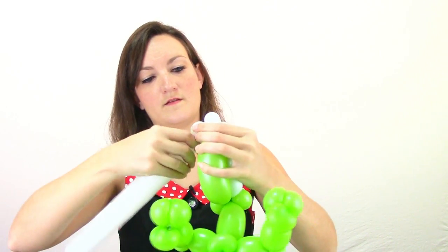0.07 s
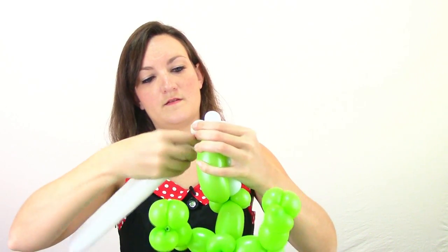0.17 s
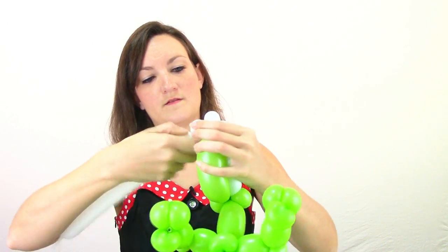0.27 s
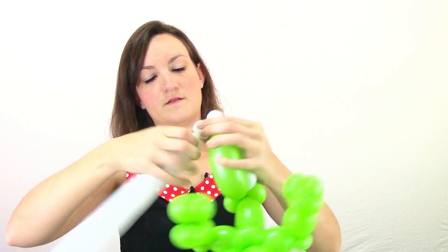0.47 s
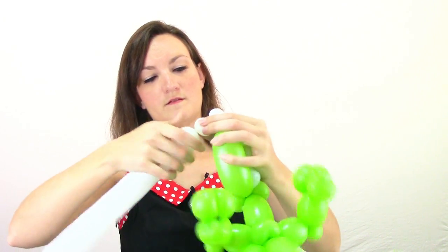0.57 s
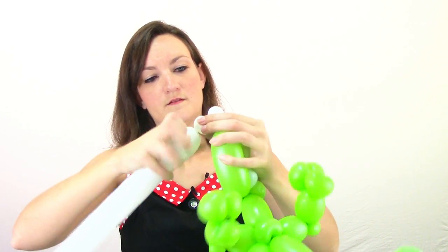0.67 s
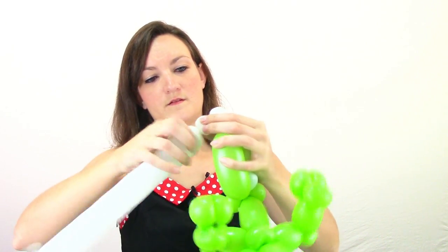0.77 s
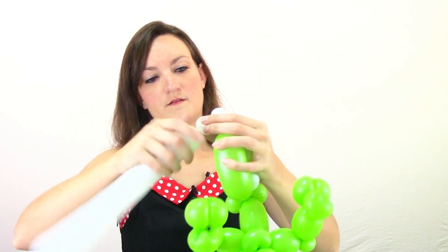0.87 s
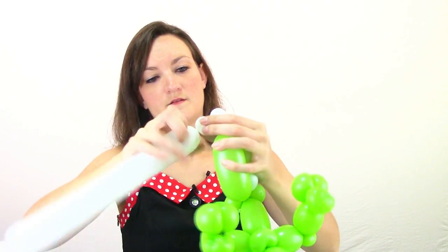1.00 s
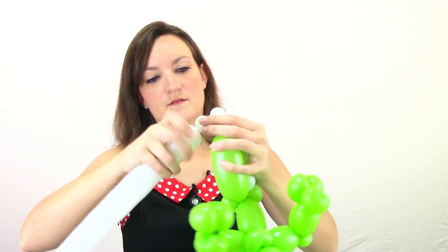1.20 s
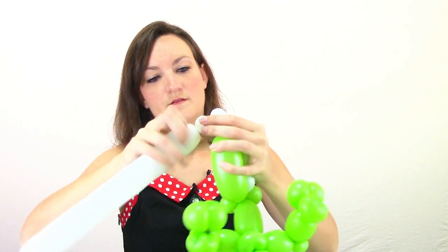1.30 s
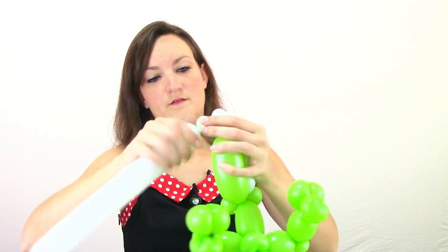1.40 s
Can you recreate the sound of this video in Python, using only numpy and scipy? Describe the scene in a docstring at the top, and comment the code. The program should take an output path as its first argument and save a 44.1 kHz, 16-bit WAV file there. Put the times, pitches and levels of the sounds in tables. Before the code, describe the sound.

Balloons rub and crackle unevenly as hands twist them, close to the microphone in a quiet room. After tiny squeaks, a twist lets go with a quick double snap at about 0.3 seconds. A low thud follows near 0.55 seconds, ringing faintly inside the balloons. The rubbing continues with short squeaks, a softer bump around 0.9 seconds and a cluster of small ticks near 1.2 seconds.

```python
"""In a quiet room, long modelling balloons are twisted by hand, close to the microphone.
Rubber drags over rubber in tiny slips that now and then lock into short squeaks.
A twist lets go with a double snap, then a bubble bumps into place with a low thud.
The air shut in the long balloons rings on, and the room adds a short echo."""
import sys
import numpy as np
from scipy import signal
from scipy.fft import rfft, irfft
from scipy.io import wavfile
from scipy.ndimage import uniform_filter1d

SR = 44100
rng = np.random.default_rng(int(sys.argv[2]) if len(sys.argv) > 2 else 0)


def log_audio(samples):
    """Write samples as a 16-bit WAV file to the path given in sys.argv[1]."""
    # one column per channel
    frames = np.atleast_2d(samples).T
    # limit to full scale, then quantise
    limited = np.clip(frames, -1, 1)
    pcm = np.round(limited * 32767).astype(np.int16)
    wavfile.write(sys.argv[1], SR, pcm)


N = 63945

# tone of the background hiss (frequency [Hz], gain [dB])
HISS_COLOUR = [(15, -58), (25, -20), (90, -4), (237, -9.5), (588, -22), (856, -2), (4150, -16.5),
               (5420, -21.5), (13500, -29.5), (15000, -43)]
# the room's echo (band centre [Hz], time to fade by 60 dB [s], level [dB])
ROOM_ECHO = [(147, 0.24, -14), (424, 0.34, -16.5), (770, 0.51, -14), (1590, 0.36, -11.5),
             (3230, 0.21, -16.5), (6800, 0.084, -10)]
# notes of the air inside the balloons (pitch [Hz], gain [dB], fade time [s])
AIR_NOTES = [(472, -1, 0.22), (642, -1, 0.81), (738, -6, 0.76), (846, -7.5, .4), (985, 2.5, 0.23),
             (1212, -7, 0.083), (1282, -3.5, 0.47), (1742, 2, 0.11), (1845, 1, 0.29), (2604, -5, 0.28),
             (2885, -7, 0.1)]
# hands nudge the balloons (time [s], level [dB])
NUDGES = [(0.235, -29), (0.507, -39), (.521, -32), (1.16, -40)]
# strength of the rubbing, before each band's trim
# (time [s], treble [dB], middle [dB], bass [dB], top [dB])
RUB_LEVELS = [(0, -43, -47.5, -57, -58), (.03, -48.5, -52, -56, -65.5), (.06, -53, -82, -64, -68),
              (.085, -52.5, -77, -62, -68), (.116, -47, -60, -66, -62), (.135, -40, -46, -63, -55),
              (.15, -35.5, -36.5, -42.5, -48.5), (.19, -36, -45, -55.5, -49), (0.214, -31.5, -39, -46, -59),
              (0.239, -49, -38, -40, -61), (0.255, -47, -35, -59, -59), (0.261, -27, -35.5, -43.5, -43),
              (.283, -41, -46, -43, -56), (.305, -39.5, -36, -45, -52), (0.332, -32, -36, -44, -56),
              (.36, -46, -43, -56, -58.5), (.41, -49.5, -39.5, -55, -60), (.452, -50.5, -42.5, -69, -59),
              (.478, -38.5, -37, -83, -54.5), (.505, -42, -44, -77, -58), (.522, -48, -41.5, -70, -57),
              (.54, -56, -43, -60, -59), (.553, -67, -43.5, -60, -56), (.585, -51, -41, -36, -59),
              (.61, -46, -42, -33, -55), (0.642, -41, -37.5, -44.5, -64), (0.668, -38, -27, -39.5, -53.5),
              (0.696, -52, -47, -46, -62), (.745, -44, -44, -47, -52.5), (.78, -39, -45, -56, -54.5),
              (.803, -41, -28.5, -43, -49.5), (0.814, -48.5, -40.5, -59, -61), (.843, -47, -45, -58, -64),
              (.865, -49.5, -33.5, -51, -52.5), (0.892, -46.5, -39, -43, -61),
              (.905, -38.5, -40, -36, -49.5), (0.922, -41, -25.5, -38, -52.5),
              (0.933, -39, -42, -47.5, -61), (.97, -66.5, -48, -54.5, -62.5), (1.01, -50, -43.5, -62, -60),
              (1.04, -41.5, -40.5, -51, -54.5), (1.068, -35.5, -34, -61, -49.5),
              (1.088, -41, -46, -51, -54.5), (1.103, -34.5, -40.5, -64, -57), (1.123, -45, -42, -51, -64),
              (1.152, -38, -38.5, -49, -54), (1.175, -43, -42, -64, -62), (1.206, -51, -38.5, -57, -74),
              (1.217, -35, -32.5, -53, -44.5), (1.228, -39, -40, -46, -59), (1.247, -43, -42, -63, -63),
              (1.268, -51.5, -46, -66, -64), (1.293, -54, -45, -65, -62), (1.302, -43.5, -41, -57, -51),
              (1.325, -45, -40, -55, -47.5), (1.36, -41.5, -33.5, -50.5, -58),
              (1.377, -53, -44, -65, -53.5), (1.415, -51, -52, -45, -70), (1.438, -40, -48, -54, -52),
              (1.45, -46, -63, -59, -70)]
# tone of the rubbing (frequency [Hz], gain [dB])
RUB_COLOUR = [(59, -51), (100, -14), (204, -15), (337, -7.5), (607, -1), (1290, -6), (1370, -9.5),
              (2180, -4.5), (2750, -6), (4260, -17.5), (5370, -27.5), (6350, -22), (7510, -33), (8880, -29),
              (9860, -35), (13800, -34.5), (15000, -53)]
# larger single slips (time [s], level [dB], boost of the bright crack [dB])
TICKS = [(0.03, -28.5, 8), (0.0911, -30.5, 7.5), (.107, -28, -6), (0.1199, -23, 6.5), (.128, -29, -6),
         (0.132, -24, -4), (.158, -18, 0.5), (0.2229, -26, -24), (0.234, -16, -13), (0.2439, -20, 1),
         (.2565, -17, -6), (.402, -27, 7), (0.4339, -26, 4), (0.5315, -30, 3), (0.6157, -27, 2),
         (.623, -23.5, 8), (0.6285, -25, 9.5), (0.6603, -25, 9), (0.6664, -24, 5.5), (.6735, -26, -1),
         (0.9205, -25.5, -6), (1.098, -20, 3), (1.104, -23.5, 5), (1.133, -22, -4), (1.1462, -26.5, 5.5),
         (1.182, -20, -4), (1.196, -20.5, -9), (1.2061, -20, -8), (1.2111, -22, -7), (1.2125, -21, -1),
         (1.363, -30, 4)]
# notes of the rubber skin (pitch [Hz], level [dB], fade time [s])
SKIN_NOTES = [(735, -13, 0.004), (1420, -22, 0.0023), (1880, -6.5, 0.0048), (2720, -6.5, 0.0094),
              (3420, -9, 0.0058), (4095, -14, 0.013)]
# gliding squeaks (time [s], length [s], first pitch [Hz], middle pitch [Hz], last pitch [Hz],
# level [dB], overtone boost [dB])
SQUEAKS = [(0.159, 0.029, 675, 830, 1220, -35.5, -10), (.183, 0.021, 720, 886, 1240, -36, 0),
           (.255, 0.013, 940, 1082, 1040, -28.5, -8), (0.48, 0.018, 598, 697, 950, -33, -1),
           (.510, 0.0086, 754, 724, 664, -28.5, -16), (0.528, 0.0069, 653, 690, 680, -29.5, 3),
           (0.742, 0.025, 1180, 796, 720, -32, -16), (0.764, 0.0321, 731.3, 744, 618, -25.5, -6),
           (.858, 0.026, 757, 837, 765, -33, -19), (1.025, 0.0176, 1116, 940, 710, -35.5, -5),
           (1.049, 0.021, 692.5, 627, 660, -31.5, 5.5), (1.068, 0.0093, 870, 1130, 1110, -29, -5),
           (1.074, 0.0048, 2900, 3130, 3250, -27.5, -20), (1.175, .011, 686, 723, 705, -29, -2),
           (1.212, 0.015, 480, 599, 676, -28.5, -17), (1.232, 0.0217, 561, 472, 446, -37.5, 3),
           (1.425, 0.019, 910, 1222, 1570, -37, -3.5)]
# a squeak's higher tones (multiple of the pitch, level before the boost [dB])
OVERTONES = [(2, -5.5), (3, -14.5), (4, -18.5), (5, -15.5), (6, -20)]
# soft bumps of the figure (time [s], level [dB], crack relative to that [dB], bass cut [Hz])
BUMPS = [(0.2252, -12.5, -26, 94), (0.5589, 0.5, -17.5, 109), (0.722, -21.5, -28, 130),
         (0.9229, -16, -22, 316)]
# notes of the slack balloon and its air (pitch [Hz], level [dB], fade time [s])
BODY_NOTES = [(146, -20.5, 0.03), (268, -3, 0.011), (421, 0.5, .014), (1130, -9, 0.0086),
              (2523, -12, 0.018), (3970, -23, 0.024), (1084, -20.5, 0.14), (1109, -30.5, 0.46),
              (2094, -21, 0.056), (2044, -37.5, 0.48)]
# a twist lets go (time [s], level [dB])
SNAPS = [(.2858, -1), (.2941, -4)]
# notes of a tight bubble (pitch [Hz], level [dB], fade time [s])
BUBBLE_NOTES = [(764, 7, 0.012), (991, -7, 0.012), (1900, -20, 0.037), (2205, -7, 0.0092),
                (2955, -10, .013), (3290, -9, 0.0099), (4360, -14, .01), (5710, -14.5, 0.0063)]

SLIPS_PER_S, SLIP_SPREAD_DB, RUB_HISS = 2200, 3.5, 0.34
SKIN_TOP_HZ, SQUEAK_WOBBLE = 4640, 0.016  # the wobble is a fraction of the pitch
HISS_DB, LEFT_DB = -53, -0.21


def undb(db):
    """Turn decibels into a number to multiply by."""
    return 10 ** (np.asarray(db) / 20)


def unit(x):
    """Scale a sound so its average strength (rms) is 1."""
    return x / np.sqrt(np.mean(x ** 2) + 1e-20)


def colour(x, points):
    """Shape a sound's tone by (frequency [Hz], gain [dB]) points."""
    hz, db = np.array(points).T
    freqs = np.maximum(np.fft.rfftfreq(len(x), 1 / SR), 1)
    gain = undb(np.interp(np.log(freqs), np.log(hz), db))
    return irfft(rfft(x) * gain, len(x))


def band(x, lo_hz, hi_hz, order=3):
    """Keep what lies between two frequencies."""
    sos = signal.butter(order, [lo_hz, min(hi_hz, SR / 2 - 1)], "band", fs=SR, output="sos")
    return signal.sosfilt(sos, x)


def low_cut(x, hz, order=2):
    """Thin out the lows: small surfaces give off little bass."""
    return signal.sosfilt(signal.butter(order, hz, "high", fs=SR, output="sos"), x)


def high_cut(x, hz, order=5):
    """Dull the highs, as soft rubber does."""
    return signal.sosfilt(signal.butter(order, hz, fs=SR, output="sos"), x)


def add(out, start, sound):
    """Mix a sound in at a start time in seconds."""
    i = max(int(start * SR), 0)
    out[i:i + len(sound)] += sound[:max(N - i, 0)]


def ring(notes, length_s, detune=0.):
    """Notes that drop 60 dB in their fade time; detune shifts each pitch at random."""
    t = np.arange(int(length_s * SR)) / SR
    out = np.zeros(len(t))
    for hz, db, fade_s in notes:
        pitch = hz * (1 + detune * rng.standard_normal())
        out += undb(db) * np.sin(2 * np.pi * pitch * t) * np.exp(-np.log(1000) * t / fade_s)
    return out


def crack(lo_hz, decay_s):
    """A very short burst of bright noise."""
    t = np.arange(SR // 20) / SR
    noise = band(rng.standard_normal(len(t)), lo_hz, 2 * lo_hz, order=1)
    return unit(noise) * np.exp(-t / decay_s)


def soft_hit(notes, rise_s):
    """Notes that swell for a moment as the skin gives way, then fade."""
    x = ring(notes, length_s=0.5)
    return x * (1 - np.exp(-np.arange(len(x)) / SR / rise_s))


def background_hiss():
    """The faint, steady noise of the quiet room."""
    return undb(HISS_DB) * unit(colour(rng.standard_normal(N), HISS_COLOUR))


def room_echo(x):
    """The room answers with a short wash of sound; each octave fades at its own speed."""
    t = np.arange(SR // 2) / SR
    onset = 1 - np.exp(-(t / 0.002) ** 2)
    tail = 0
    for hz, fade_s, db in ROOM_ECHO:
        noise = band(rng.standard_normal(len(t)), hz / np.sqrt(2), hz * np.sqrt(2))
        octave = unit(noise * onset * np.exp(-np.log(1000) * t / fade_s))
        width_scale = np.sqrt(np.sqrt(2) * hz / SR / len(t))
        tail += undb(db) * octave * width_scale
    return signal.fftconvolve(x, tail)[:N]


def trapped_air(skin):
    """The air shut in the long balloons rings along with the rubber."""
    response = 0
    for hz, db, fade_s in AIR_NOTES:
        scale = 2 * np.log(1000) / (fade_s * SR)  # so a long note gains no more than a short one
        response += scale * ring([(hz, db, fade_s)], length_s=0.5)
    return signal.fftconvolve(skin, response)[:N]


def nudges():
    """Faint, dull thuds as the grip shifts."""
    out = np.zeros(N)
    pitch_hz, fade_s = 103, 0.042
    for start, db in NUDGES:
        add(out, start, undb(db) * soft_hit([(pitch_hz, 0, fade_s)], rise_s=0.0032))
    return low_cut(out, hz=65)


def rubbing():
    """A stream of tiny, uneven slips; four bands swell and sink as the hands press and turn."""
    t = np.arange(N) / SR
    times, treble, middle, bass, top = np.array(RUB_LEVELS).T
    slipping = rng.random(N) < SLIPS_PER_S / SR
    sizes = undb(SLIP_SPREAD_DB * np.clip(rng.standard_normal(N), -2, 2))
    slips = slipping * sizes * rng.choice([-1, 1], N)
    friction = unit(slips) + RUB_HISS * rng.standard_normal(N)
    strength = np.sqrt(uniform_filter1d(friction ** 2, size=700))
    steady_rub = colour(friction / strength, RUB_COLOUR)
    # (low edge [Hz], high edge [Hz], levels with their trim [dB])
    bands = [(160, 481, bass - 1.5), (481, 1420, middle - 3),
             (1420, 4170, treble - 1.5), (4170, 20000, top + 3.5)]
    return sum(unit(band(steady_rub, lo, hi, order=4)) * undb(np.interp(t, times, db))
               for lo, hi, db in bands)


def ticks():
    """Larger single slips make the skin ring briefly, each with a tiny crack."""
    out = np.zeros(N)
    for start, db, boost_db in TICKS:
        ping = ring(SKIN_NOTES, length_s=0.05, detune=0.097)
        add(out, start, undb(db) * high_cut(ping, SKIN_TOP_HZ))
        add(out, start, undb(db + boost_db - 20.5) * crack(lo_hz=5100, decay_s=0.00074))
    return low_cut(out, hz=493)


def squeaks():
    """The slips lock into a regular beat, heard as a wobbling, gliding tone."""
    out = np.zeros(N)
    for start, length, first, middle, last, db, boost_db in SQUEAKS:
        progress = np.linspace(0, 1, int(length * SR))
        glide_hz = np.interp(progress, [0, .5, 1], [first, middle, last])
        wobble = unit(uniform_filter1d(rng.standard_normal(SR // 10), size=60))[:len(progress)]
        phase = 2 * np.pi * np.cumsum(glide_hz * (1 + SQUEAK_WOBBLE * wobble)) / SR
        overtones = sum(undb(part_db + boost_db) * np.sin(k * phase) for k, part_db in OVERTONES)
        swell = np.sqrt(4 * progress * (1 - progress))
        add(out, start, undb(db) * (np.sin(phase) + overtones) * swell)
    return high_cut(out, SKIN_TOP_HZ)


def bumps():
    """A bubble pops into place: a low thud with a faint crack, and the air inside rings on."""
    out = np.zeros(N)
    for start, db, crack_db, low_hz in BUMPS:
        thud = low_cut(soft_hit(BODY_NOTES, rise_s=0.001), low_hz, order=3)
        click = high_cut(crack(lo_hz=1480, decay_s=0.0013), hz=8700, order=2)
        add(out, start, undb(db) * thud)
        add(out, start, undb(db + crack_db) * click)
    return out


def snaps():
    """The twist jumps twice and kicks a tight bubble; the skin crackles for a moment."""
    out = np.zeros(N)
    for start, db in SNAPS:
        kick = high_cut(soft_hit(BUBBLE_NOTES, rise_s=0.00071), hz=6500, order=3)
        add(out, start, -undb(db) * kick)
        add(out, start, undb(db - 28) * crack(lo_hz=2560, decay_s=0.0028))
    return low_cut(out, hz=410)


def scene():
    """Balloons and room together, the same in both ears but a touch softer on the left."""
    skin = rubbing() + ticks() + snaps() + squeaks()
    balloons = skin + trapped_air(skin) + bumps() + nudges()
    mono = balloons + room_echo(balloons) + background_hiss()
    return np.array([mono * undb(LEFT_DB), mono])


def record(dry):
    """Round off the loudest peaks and cut the very highest sounds."""
    top_hz = 14500
    return signal.sosfilt(signal.ellip(10, .2, 70, top_hz, fs=SR, output="sos"), np.tanh(dry))


dry = scene()
out = record(dry)
log_audio(out)
```